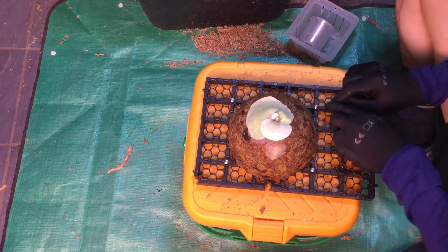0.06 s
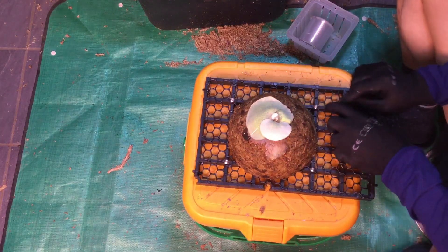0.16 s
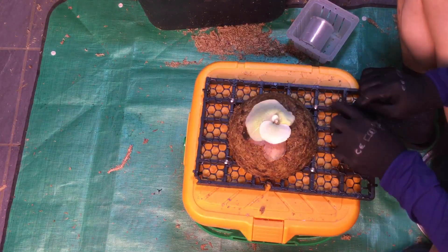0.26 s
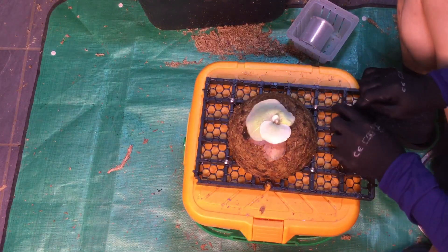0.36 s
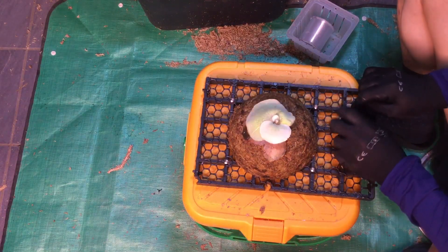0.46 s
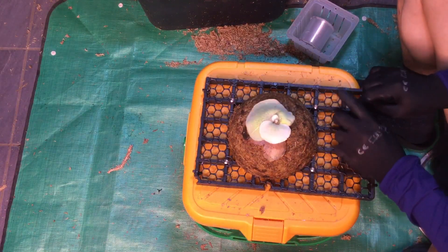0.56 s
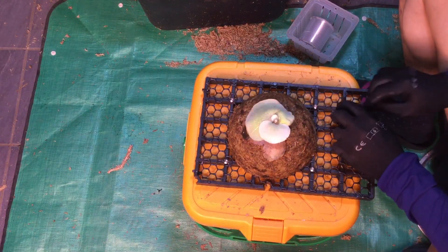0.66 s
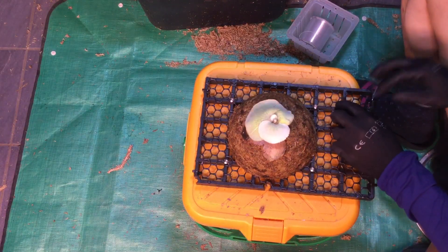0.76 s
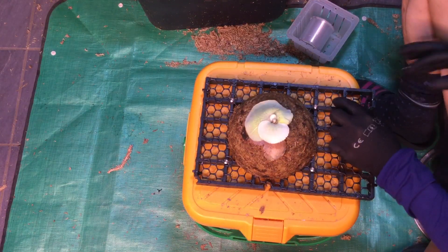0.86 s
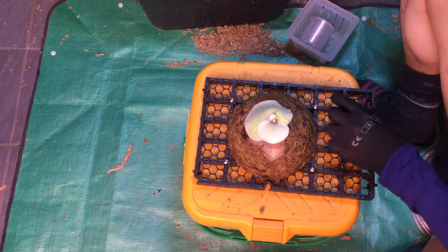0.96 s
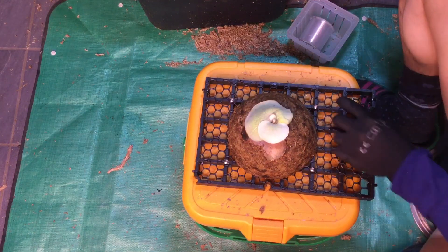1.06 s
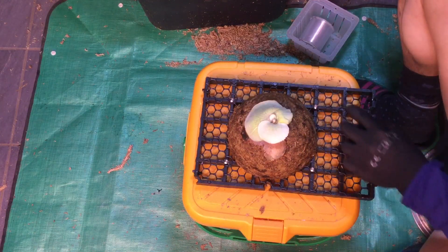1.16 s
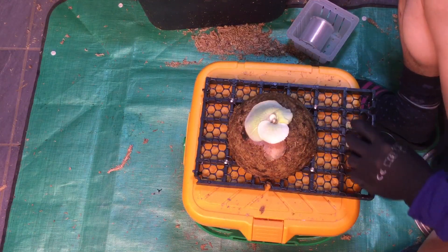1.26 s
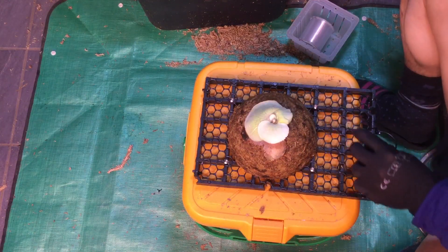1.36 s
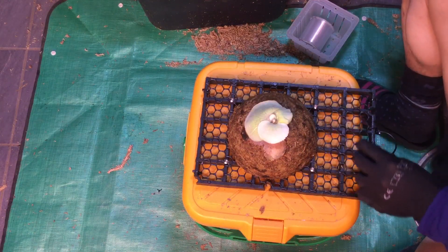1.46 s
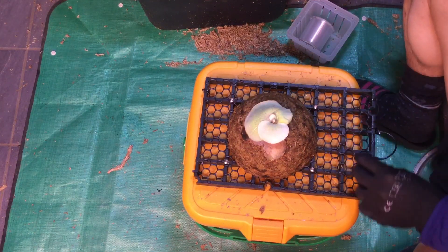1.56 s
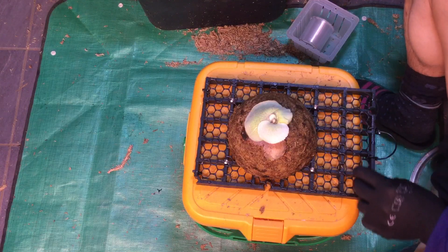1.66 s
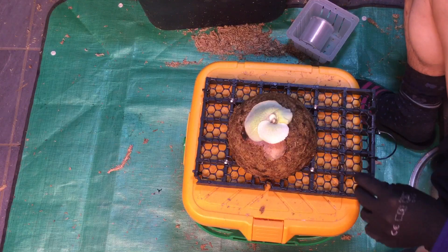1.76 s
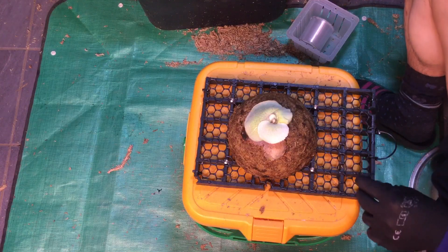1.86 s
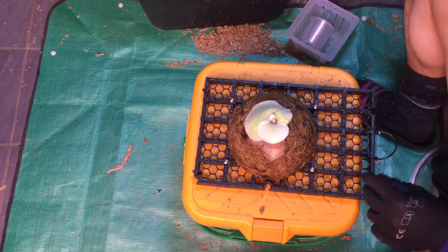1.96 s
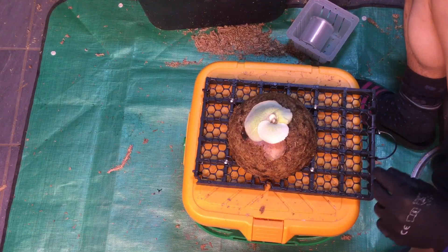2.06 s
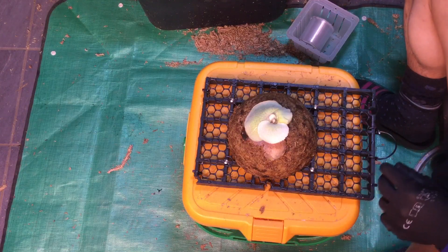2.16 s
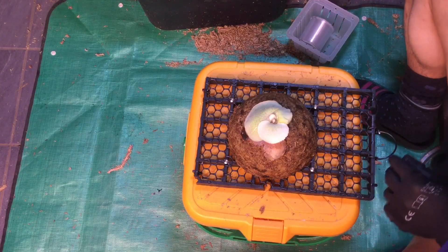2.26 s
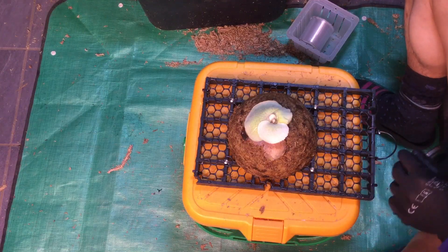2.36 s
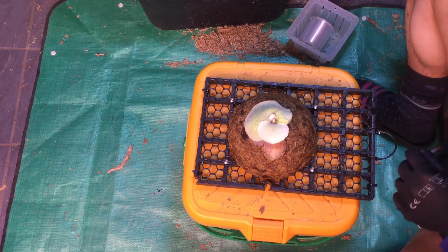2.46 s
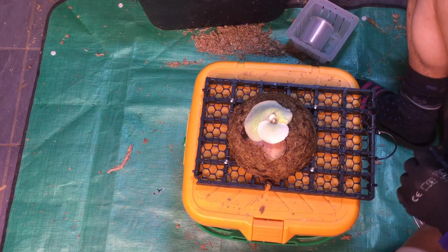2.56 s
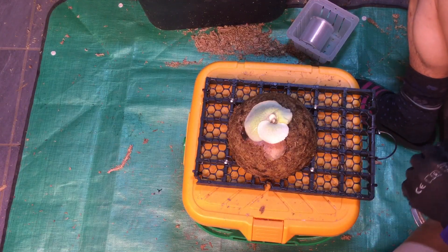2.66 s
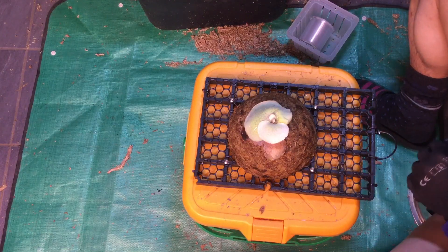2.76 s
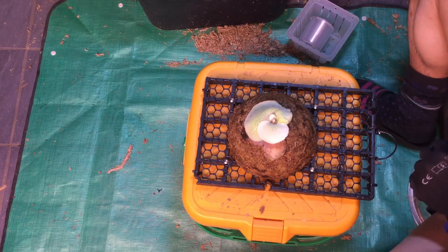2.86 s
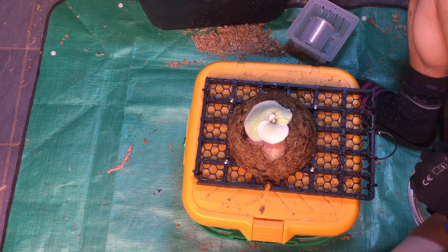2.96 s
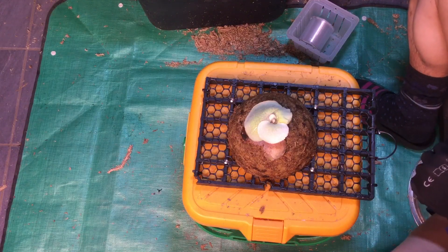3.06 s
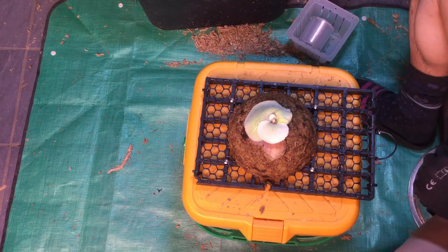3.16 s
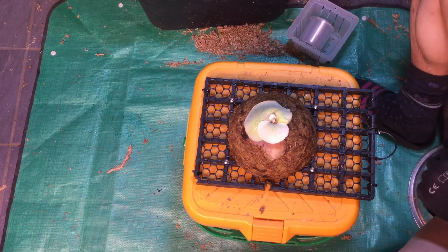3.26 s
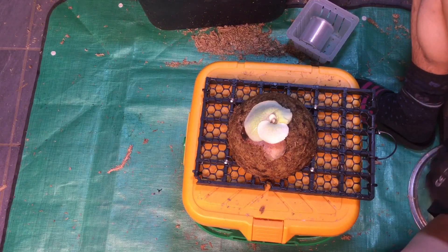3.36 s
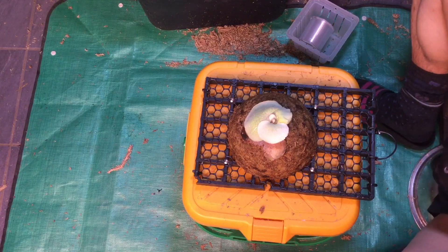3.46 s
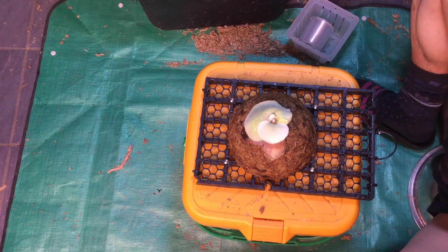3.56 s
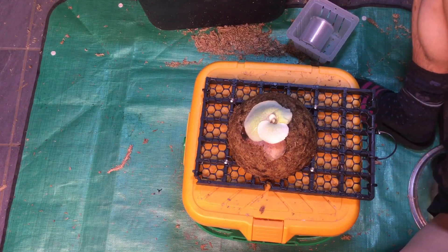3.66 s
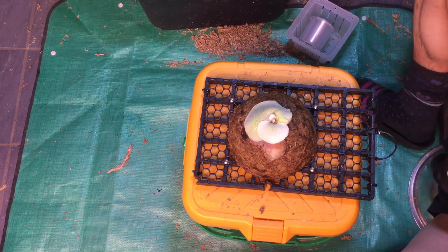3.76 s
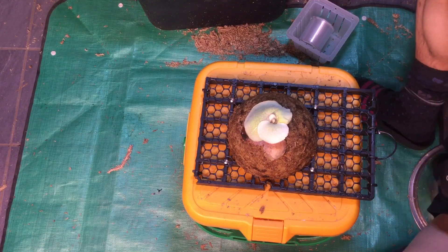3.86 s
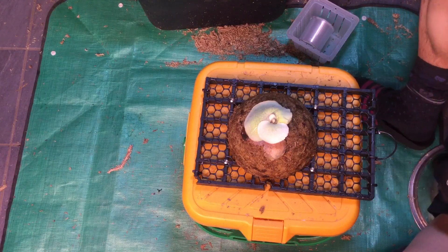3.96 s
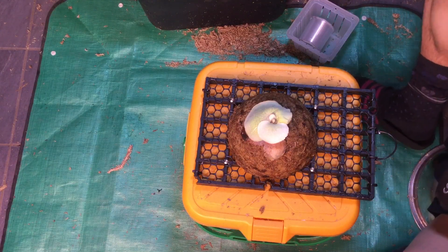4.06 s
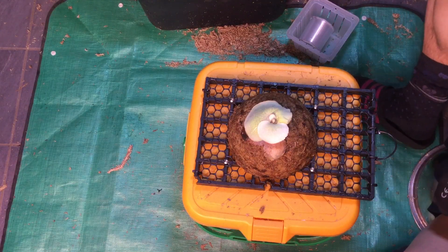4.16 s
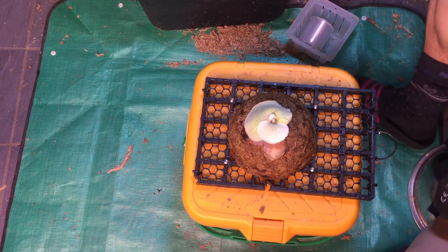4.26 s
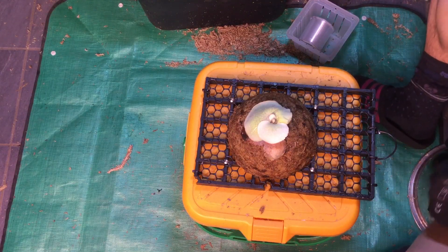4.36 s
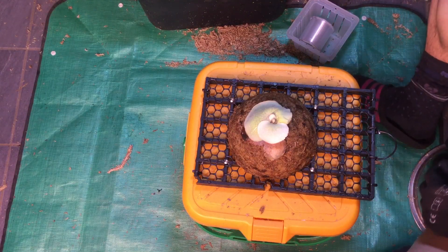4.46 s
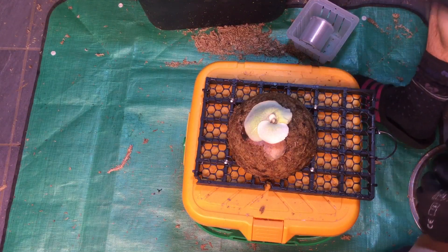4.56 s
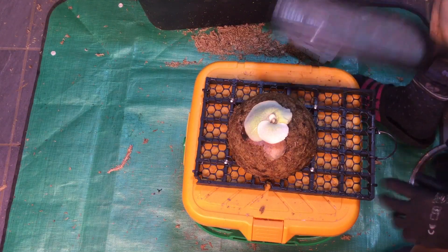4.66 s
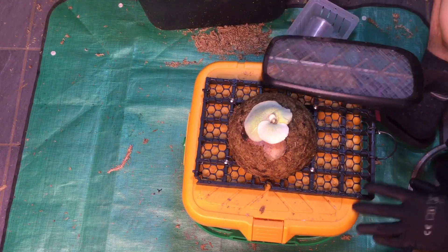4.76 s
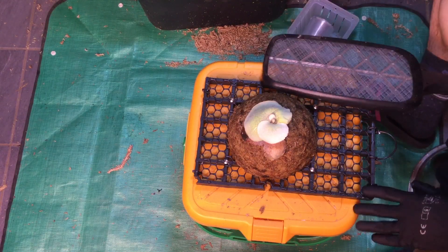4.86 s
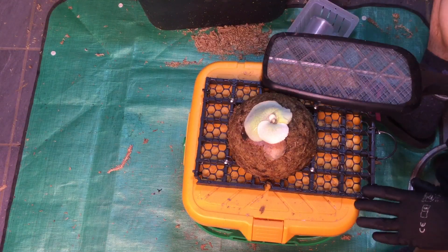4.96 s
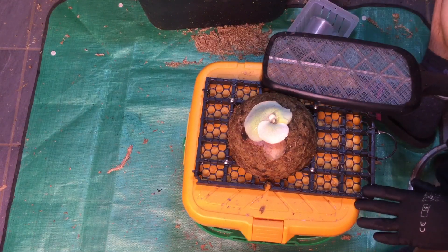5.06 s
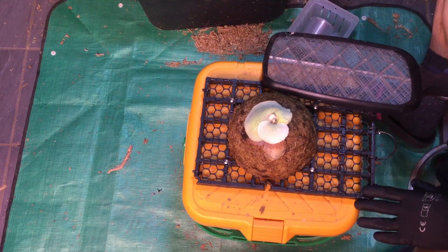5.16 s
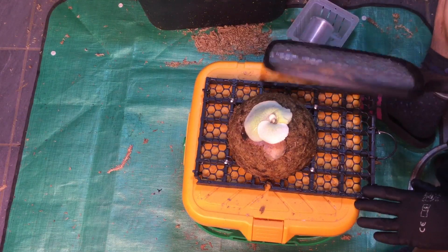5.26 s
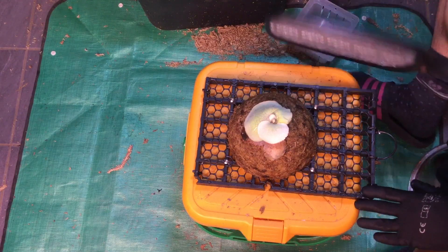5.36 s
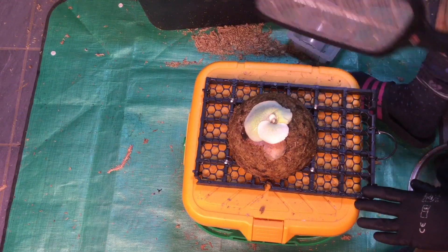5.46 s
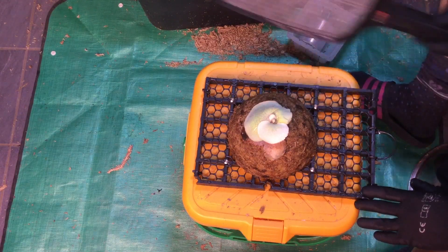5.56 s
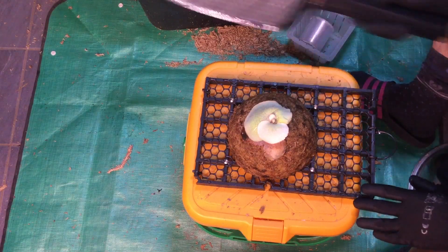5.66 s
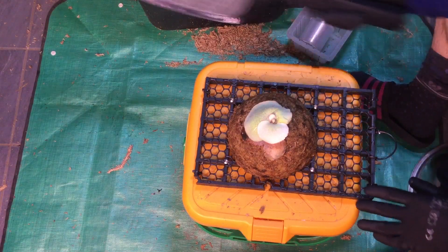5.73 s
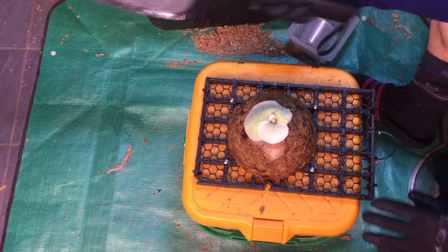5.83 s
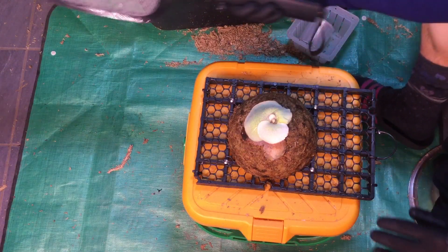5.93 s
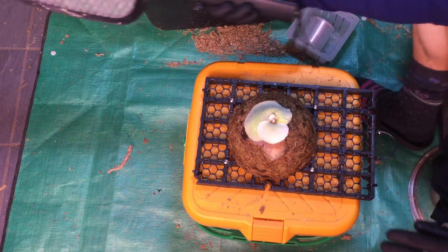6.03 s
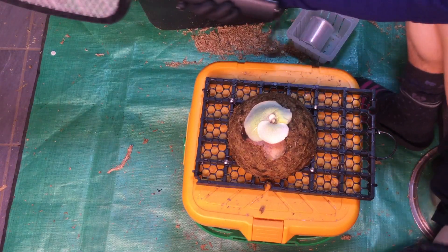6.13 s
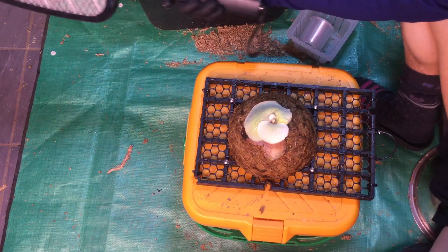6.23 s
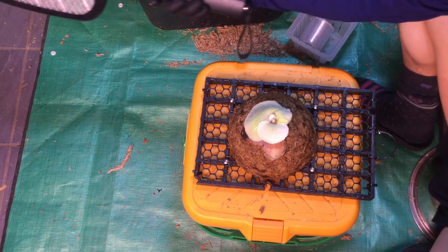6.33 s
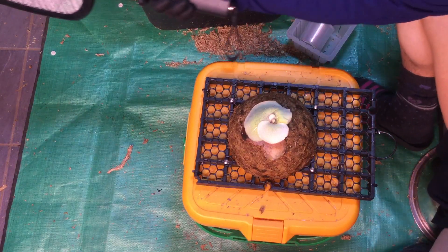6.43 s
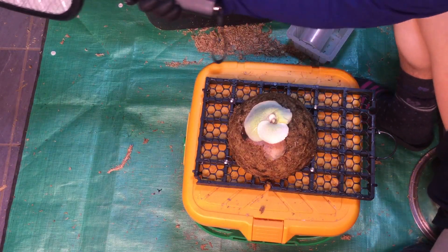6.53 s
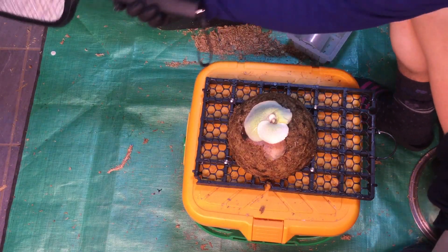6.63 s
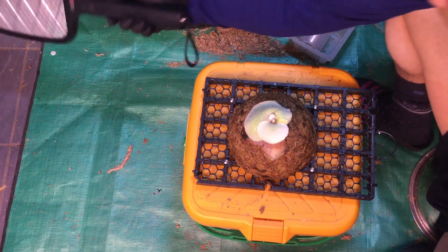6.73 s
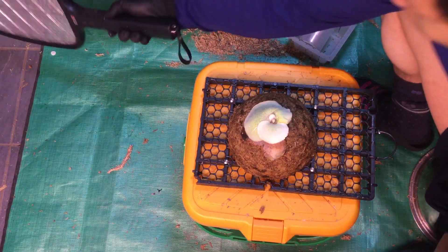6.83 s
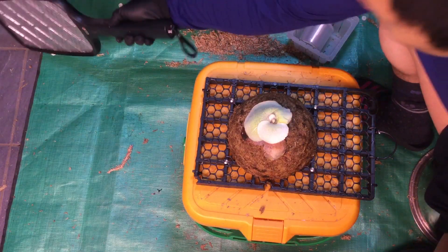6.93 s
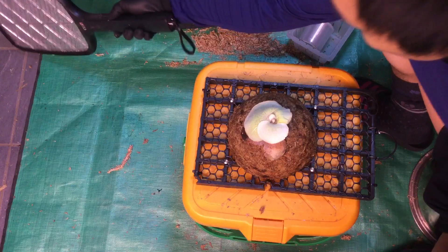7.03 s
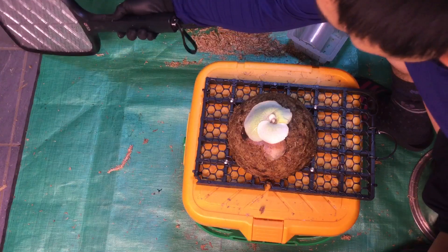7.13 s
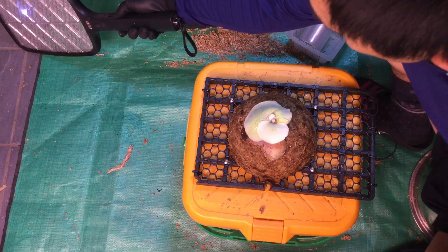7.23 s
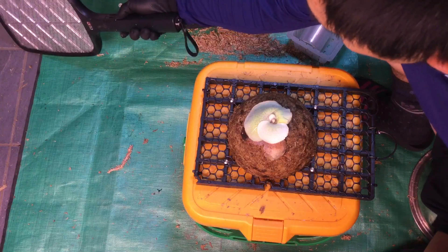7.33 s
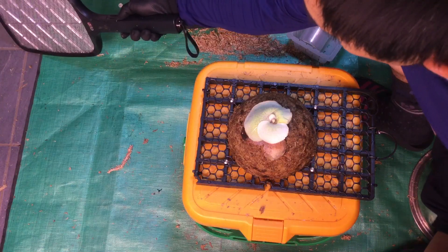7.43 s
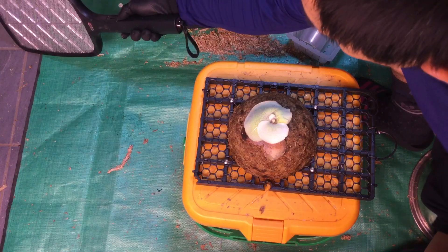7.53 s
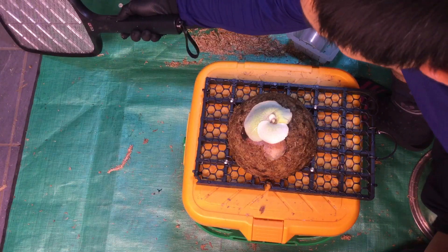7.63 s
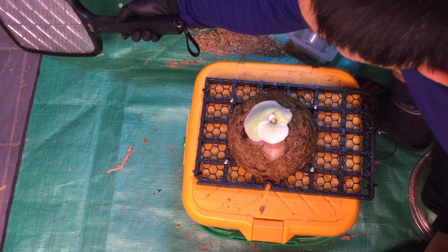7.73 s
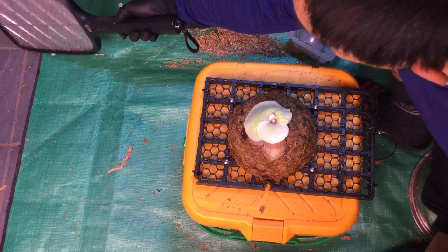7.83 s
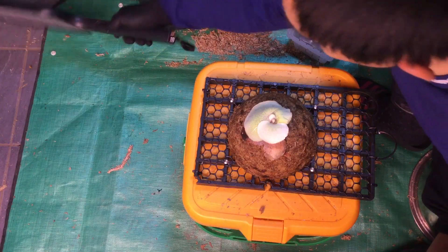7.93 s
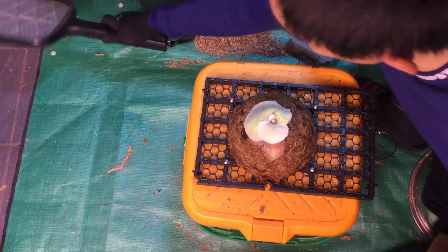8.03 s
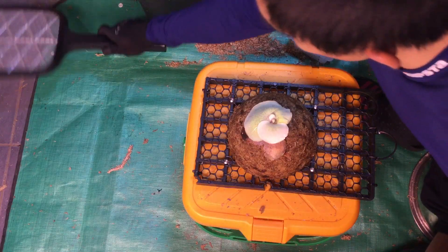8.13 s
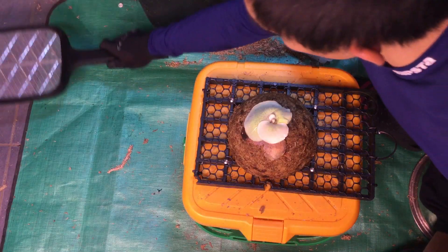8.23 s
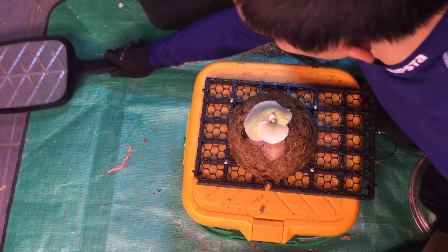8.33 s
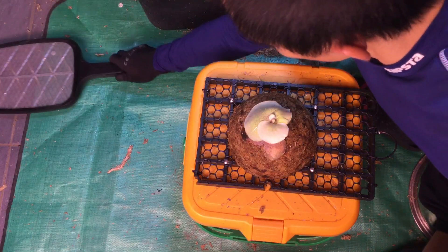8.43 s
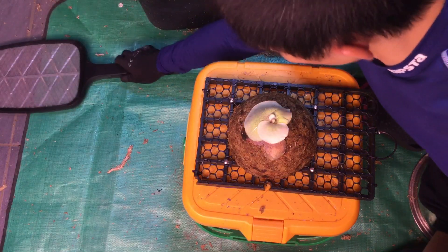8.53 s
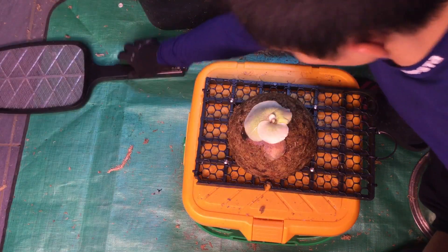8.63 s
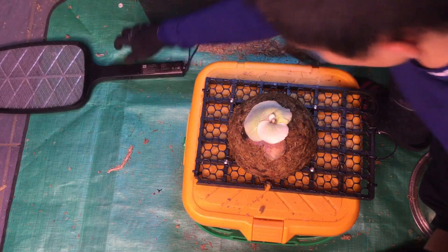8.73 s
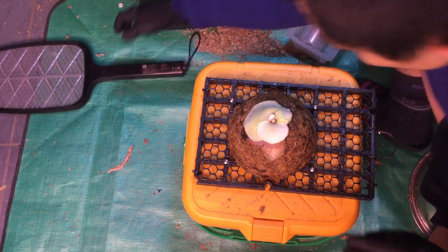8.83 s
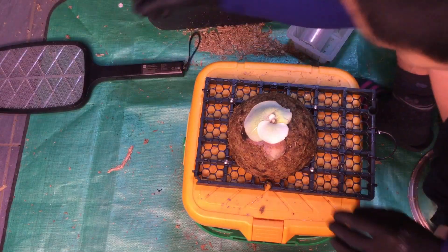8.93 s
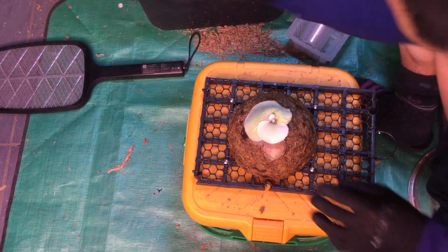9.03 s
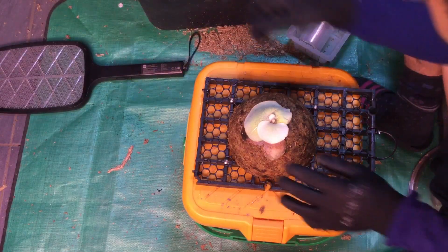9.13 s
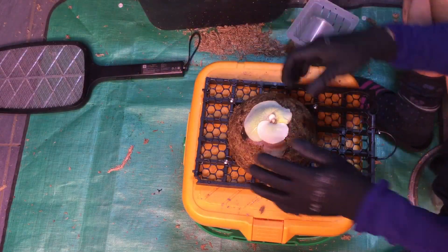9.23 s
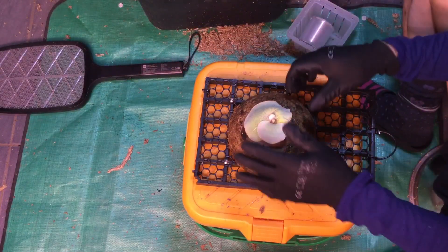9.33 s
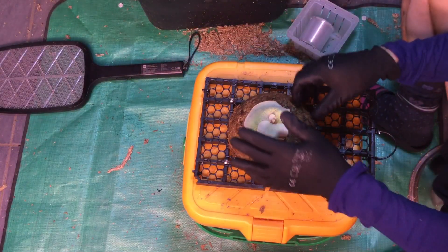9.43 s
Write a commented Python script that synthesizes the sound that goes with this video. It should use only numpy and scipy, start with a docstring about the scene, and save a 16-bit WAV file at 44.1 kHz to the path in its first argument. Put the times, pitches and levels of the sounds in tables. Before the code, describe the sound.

An electric fly racket is handled and fired indoors, close-miked with hard, bright reflections. First come sparse snaps, then a busy burst of plastic clatter, tarp rustle and hollow knocks with a thin metal ring. Small clicks and a hard plastic clack follow, then faint ticking. A single sharp spark bursts out, then three more close together, distorted and ending in short downward whomps. Quieter handling snaps and a soft sleeve brush finish.

```python
"""Small hard room: an electric fly racket sparks four times close to a microphone.
Sparks are noise cracks and jolts in dense reflections, a weak arc leading the second; the overloaded
microphone answers each of the four with a low whomp that glides down, a sine of falling pitch.
Gloved hands snap and knock a plastic box and a metal lid: noise clicks and dying modes. Drifting noise makes
tarp rustle, sleeve and low hum; random clicks tick, wavering sines squeak. Gain control ducks, peaks clip."""
import sys
import numpy as np
from scipy import signal
from scipy.fft import rfft, irfft
from scipy.io import wavfile
from scipy.ndimage import uniform_filter1d

SR = 44100
rng = np.random.default_rng(int(sys.argv[2]) if len(sys.argv) > 2 else 0)


def waveform_to_disk(signal):
    """Save audio, clipped to [-1, 1], as 16-bit WAV at the path in sys.argv[1]."""
    frames = np.transpose(np.atleast_2d(signal))
    scaled = np.clip(frames, -1, 1) * 32767
    samples = np.round(scaled).astype(np.int16)
    wavfile.write(sys.argv[1], SR, samples)


N = 418509


def gain_of(db):
    """Decibels to amplitude gain."""
    return 10 ** (np.asarray(db) / 20)


def evened(x):
    """Scales to rms 1."""
    return x / np.sqrt(np.mean(x ** 2) + 1e-20)


def read(points, hz):
    """Interpolates a table on a log-frequency axis."""
    f, value = np.transpose(points)
    return np.interp(np.log(hz + 1), np.log(f + 1), value)


def add(mix, s, sound):
    """Mixes a sound in at time s, cut at the end of the mix."""
    part = mix[round(s * SR):][:len(sound)]
    part += sound[:len(part)]


def click_in_room(colour, rise_s, lasting, grain_db, late_db, late_t60):
    """A click heard through dense reflections: coloured noise, each band decaying at its own rate."""
    # room decay before the factor lasting: f/Hz, t60/s
    room = [(300, 0.07), (700, 0.06), (1400, .11), (3000, .19), (6000, 0.18), (11000, 0.16), (15500, 0.14)]
    far_dull_db_per_octave = -3  # the long way round the room dulls the late tail
    t = np.arange(22050) / SR
    hz = np.fft.rfftfreq(len(t), 1 / SR)
    white, lumps = rng.standard_normal((2, len(t)))
    noise = rfft(white) * gain_of(read(colour, hz))
    noise /= np.sqrt(2 * np.sum(abs(noise) ** 2)) / len(t)
    out = np.zeros(len(t))
    for share, (centre_hz, t60) in zip(np.eye(len(room)), room):
        weights = read([(f, w) for (f, _), w in zip(room, share)], hz)
        band = irfft(noise * weights, len(t))
        early = gain_of(-60 * t / t60 / lasting)
        # a slower tail returns from the far end of the room
        dull_db = far_dull_db_per_octave * np.log2(centre_hz / 6000)
        late = gain_of(late_db + dull_db - 60 * t / late_t60)
        out += band * (early + late)
    # early echoes arrive in uneven clumps
    clump_db = grain_db * evened(uniform_filter1d(lumps, size=120)) * np.exp(-t / 0.03)
    return out * gain_of(clump_db) * (1 - np.exp(-t / rise_s))


def ring(modes, rise_s):
    """Struck body: exponentially dying sines with random phases."""
    t = np.arange(2 * SR) / SR
    out = np.zeros(len(t))
    for hz, db, t60 in modes:
        out += gain_of(db - 60 * t / t60) * np.sin(2 * np.pi * (hz * t + rng.random()))
    return (1 - np.exp(-t / rise_s)) * out


def drifting_noise(colour, level_db, patchy_db, flicker_db, size):
    """Random short-time spectra with drifting patches and a flicker shared by all bands."""
    frames, hz = 4 * N // size + 5, np.fft.rfftfreq(size, 1 / SR)
    a, b, patches = rng.standard_normal((frames, len(hz), 3)).T
    patches = uniform_filter1d(patches, size=6, axis=0)  # along frequency
    patches = evened(uniform_filter1d(patches, size=10, axis=1))  # along time
    flicker = evened(uniform_filter1d(rng.standard_normal(frames), size=8))
    bin_db = read(colour, hz)[:, None] + patchy_db * patches + flicker_db * flicker
    spectra = (a + 1j * b) * gain_of(bin_db)
    noise = evened(signal.istft(spectra, nperseg=size, noverlap=size - size // 4)[1][:N])
    return noise * gain_of(np.interp(np.arange(N) / SR, *np.transpose(level_db)))


def hum():
    """Low room hum: broad noise, strongest near 75 Hz, drifting slightly."""
    # hum spectrum: f/Hz, relative density/dB
    colour = [(24, -38.5), (40, -16), (75, 1.5), (140, -5), (230, -5), (312, -11.5), (800, -17.5),
              (1080, -14), (1400, -19.5), (2000, -25.5), (2700, -30), (4570, -36.5), (6020, -43),
              (11000, -49), (16000, -57.5)]
    # hum course: t/s, level/dB
    level = [(0.0, -47), (9.49, -55)]
    return drifting_noise(colour, level, 2.6, 0.55, size=2048)


def drones():
    """Noise swelling and sinking by chance in two narrow low room resonances."""
    # resonances: f/Hz, width/Hz, mean level/dB
    modes = [(119, 21, -61), (187, 50, -60)]
    waver_rms_db = 4.5
    out, times_s = np.zeros(N), np.arange(0, 10, .1)
    for hz, width, db in modes:
        peak = [(hz - 3 * width / 2, -80), (hz - width / 2, 0),
                (hz + width / 2, 0), (hz + 3 * width / 2, -80)]
        waver = evened(uniform_filter1d(rng.standard_normal(len(times_s)), size=3))
        level = list(zip(times_s, db + waver_rms_db * waver))
        out += drifting_noise(peak, level, 0, 0, size=4096)
    return out


def rustle():
    """Tarp and sleeves moving: flickering patchy noise under a level curve."""
    # rustle spectrum: f/Hz, relative density/dB
    colour = [(590, -26.5), (1000, -6), (2280, -9.5), (2780, -11.5), (3050, -8.5), (6700, -16),
              (13300, -18.5), (16000, -22)]
    # rustle course: t/s, level/dB
    level = [(0.0, -89), (0.53, -77), (0.85, -70), (1.62, -87), (1.84, -61), (2.3, -51.5), (2.43, -42.5),
             (2.8, -44), (2.92, -75), (3.2, -64.5), (3.33, -73), (3.5, -60), (3.92, -62.5), (4.1, -73),
             (4.2, -65.5), (4.5, -76), (5.7, -70.5), (6.102, -74), (8.099, -67), (8.6, -76), (9.49, -73)]
    return drifting_noise(colour, level, 2.2, 3.2, size=512)


def sleeve():
    """A sleeve brushes softly as the hands reach in: mid-band noise with little flicker."""
    # brush spectrum: f/Hz, relative density/dB
    colour = [(900, -30), (1500, -3), (2600, 0.1), (4200, -6), (6500, -26), (16000, -45)]
    # brush course: t/s, level/dB
    level = [(8.95, -95), (9.1, -66), (9.3, -65.5), (9.49, -66.5)]
    return drifting_noise(colour, level, 2.2, 1.2, size=1024)


def ticks():
    """Racket waved: sparse random clicks of uneven size and set louder mesh ticks, with a short room tail."""
    # random ticks: t/s, rate/(1/s), none below zero
    tick_rate = [(4.95, 0), (5.0, 40), (5.7, -9)]
    # tick spectrum: f/Hz, relative density/dB
    colour = [(5000, -28), (8500, -2), (11000, -3), (14000, 8), (16000, -3.5)]
    # louder mesh ticks: t/s, level/dB
    mesh_ticks = [(5.116, -52), (5.286, -51), (5.384, -54), (5.674, -51), (5.821, -53), (8.015, -47)]
    least_db = -59.5
    chance, size = rng.random(N), rng.exponential(1, N)
    rate = np.interp(np.arange(N) / SR, *np.transpose(tick_rate))
    train = (chance < rate / SR) * gain_of(least_db + 1.9 * np.minimum(size, 4))
    for s, db in mesh_ticks:
        add(train, s, gain_of([db]))
    return signal.oaconvolve(train, click_in_room(colour, 0.00025, 0.13, 1.5, -12, 0.19))[:N]


def squeaks():
    """Thin glove squeaks: short high sines with randomly wavering pitch."""
    # squeaks: t/s, length/s, mean f/Hz, level/dB
    whistles = [(2.978, 0.053, 9200, -61.5), (3.03, 0.04, 13200, -61)]
    out = np.zeros(N)
    for s, length_s, hz, db in whistles:
        waver = evened(uniform_filter1d(rng.standard_normal(8820), size=200))[:round(length_s * SR)]
        turns = np.cumsum(hz * (1 + 0.014 * waver)) / SR
        window = signal.windows.tukey(len(turns), .5)
        add(out, s, gain_of(db) * np.sin(2 * np.pi * turns) * window)
    return out


def snaps():
    """Plastic, clips and tarp snap: tilted noise clicks; drawn-out ones scrape, then die faster."""
    # snaps: t/s, level/dB, decay factor, tilt/(dB/octave), body below 1.5 kHz/dB, bite at 4-5 kHz/dB
    events = [(0.266, -30, 0.69, -4.5, -4.5, -2.1), (0.583, -48.5, 0.65, -4.5, -1.5, 3),
              (1.641, -47, 1.7, 3.5, 5, 0.1), (1.669, -42.5, 1.6, 1, 6, 2),
              (1.752, -40.5, 2.7, -0.6, 12, -4), (1.871, -43.5, 0.47, -0.5, 16, 0.1),
              (1.987, -41, 0.97, 0.5, -4, 5), (2.059, -38.5, 2.4, -0.4, -1, 2.5),
              (2.249, -24.5, 1.8, 2.5, -1, 4), (2.316, -27.5, 1.7, -4, -3.5, 0.1),
              (2.368, -19, 1.5, -2, -4, -3.5), (2.514, -25.5, 1.8, 0.1, -1.5, -1.5),
              (2.608, -26, 0.99, -2.5, 3, 5), (2.66, -27, 1.77, 2, 5, 3.5),
              (2.771, -38.5, 3.1, -6.5, -17, 7), (2.819, -40.5, 2.45, -2.5, 0.5, -6),
              (2.988, -45.5, 0.69, -9.5, -17, -5), (3.138, -55, 1.4, 0.1, 5, 3),
              (3.542, -51, 0.23, 2.5, 9, 0.1), (3.789, -49, 0.64, -5, 1, 7),
              (3.853, -45.5, 0.5, -4.5, 0, 6), (4.208, -55, 2.3, -6.5, -17, 0.1),
              (4.243, -45.5, 0.53, -0.3, 5, -5), (4.38, -59, 0.5, 3, 0.9, 2),
              (4.829, -18.5, 2.16, 2, 16, 4.5), (4.872, -22, 0.67, 2.5, 13, 7),
              (5.541, -49.5, 0.8, -2.5, -16, -3), (6.908, -59, 0.6, 0.1, 1.8, 5),
              (8.062, -45, 1.55, -5, -15, -1), (8.133, -35, 0.76, -3.5, -4, -6),
              (8.213, -33.5, 0.54, -12.5, -10.5, 0.1), (8.556, -28.5, 2.6, 2.5, -10.5, 1.5),
              (8.598, -35, 1.2, -3, -20, 12), (8.69, -21, 1.32, -3.5, -8, 1.5)]
    # common snap spectrum: f/Hz, relative density/dB
    base_colour = [(250, -55), (900, -46), (2000, -46.5), (3200, -48), (4300, -46.5), (5600, -51),
                   (8000, -53.5), (13000, -54)]
    scrape_s, let_go_db_per_s = 0.11, 200
    out, t = np.zeros(N), np.arange(22050) / SR
    near = 1 + 0.2 * np.exp(-t / 0.00034)  # direct tick stands out of its echoes
    for s, db, lasting, tilt_db, body_db, bite_db in events:
        colour = []
        for hz, density_db in base_colour:
            tilted_db = density_db + tilt_db * np.log2(hz / 4500)
            colour.append((hz, tilted_db + body_db * (hz < 1500) + bite_db * (4000 < hz < 5000)))
        let_go = gain_of(-let_go_db_per_s * np.maximum(t - scrape_s, 0) * (lasting > 1.2))
        click = click_in_room(colour, 1 / 2000, lasting, 1.1, -33.0, 0.68)
        add(out, s, gain_of(db) * near * let_go * click)
    return out


def knocks():
    """Knocks on the hollow box: its modes ring and loose contents rattle as slow-rising noise."""
    # knocks: t/s, relative level/dB, mode pitch factor
    blows = [(0.27, -28.5, 0.88), (1.761, -31, 0.98), (2.01, -33.5, 0.8), (2.06, -27, 0.94),
             (2.328, -20.5, 1), (2.369, -13, 0.99), (2.457, -24, 0.91), (2.54, -18, 0.91),
             (2.615, -15, 0.94), (2.768, -30, 0.88), (4.835, -22.5, 0.93), (8.212, -38, 0.9),
             (8.693, -41.5, 0.97)]
    # box modes before the pitch factor: f/Hz, relative level/dB, t60/s
    box = [(100, -14, 0.15), (168.6, -1.5, 0.23), (201.6, 1, 0.28), (277, -8, 0.34), (353.5, -2.5, 0.29),
           (413, -5.5, 0.12), (577, -32.5, 0.3), (688, -12.5, 0.15), (805, -9.5, 0.1)]
    # rattle spectrum: f/Hz, relative density/dB
    rattle_colour = [(60, -2.5), (120, 5), (250, 11), (500, -3.5), (900, -11.5), (1600, -36)]
    out = np.zeros(N)
    for s, db, factor in blows:
        modes = [(hz * factor, mode_db, t60) for hz, mode_db, t60 in box]
        add(out, s, gain_of(db - 6.0) * ring(modes, 0.003))
        add(out, s, gain_of(db - 5.0) * click_in_room(rattle_colour, 0.016, 3.0, 1.8, -29, 0.34))
    return out


def racket_blows():
    """Blows on the plastic racket frame: short-lived modes."""
    # frame modes: f/Hz, relative level/dB, t60/s
    frame = [(817, -9, 0.037), (1800, -6.5, 0.058), (2370, -7, 0.045), (2850, -14.5, 0.031),
             (3700, -7.5, 0.035), (4274, -5.5, 0.021)]
    # blows: t/s, relative level/dB
    blows = [(4.832, -28), (4.873, -30), (8.693, -11.5)]
    out = np.zeros(N)
    for s, db in blows:
        add(out, s, gain_of(db) * ring(frame, 0.00085))
    return out


def lid():
    """Metal lid struck once: long high modes, stopped by a hand."""
    # lid modes: f/Hz, level/dB, t60/s
    modes = [(2532, -39, 2.), (2549, -50, 2.), (4000, -56, 1.2)]
    blow_s, held_s, held_db_per_s = 2.369, 3.37, 300
    out = np.zeros(N)
    tone = ring(modes, 0.0018)
    since_held_s = np.maximum(np.arange(len(tone)) / SR + blow_s - held_s, 0)
    add(out, blow_s, tone * gain_of(-held_db_per_s * since_held_s))
    return out


def sparks():
    """A bright crack fills the room, the frame jolts; the overloaded microphone adds a down-gliding whomp."""
    # sparks: t/s, crack/dB, jolt/dB, whomp/dB, whomp start f/Hz, glide/s, whomp t60/s
    events = [(6.1503, -7.5, -8, -0.2, 831, 0.0027, .05), (7.003, -6, -6, -5.5, 510, 0.006, 0.095),
              (7.1672, -6.5, -4, -1.5, 753, .0062, .07), (7.324, -7, -1.5, -1, 698, 0.0056, 0.061)]
    # weaker arc just ahead of the second spark, no whomp: t/s, crack/dB, jolt/dB
    first_arc = (6.999, -15.5, -9.5)
    # crack spectrum: f/Hz, relative density/dB
    crack_colour = [(300, -38.5), (600, 1.5), (1100, -2.5), (2000, -7.5), (3800, -2), (6600, -4),
                    (10000, 0), (13800, 5), (16500, -10)]
    # jolt spectrum: f/Hz, relative density/dB
    jolt_colour = [(100, -10.5), (300, 7.5), (700, 2.5), (1300, 2.5), (2200, -5.5), (4000, -22)]
    whomp_end_hz = 50
    out, t = np.zeros(N), np.arange(22050) / SR
    near = 1 + 0.14 * np.exp(-t / 0.11)  # direct sound and nearest surfaces come strongest
    for s, crack_db, jolt_db in [first_arc] + [row[:3] for row in events]:
        crack = near * click_in_room(crack_colour, 0.00071, 1, 0.52, -41, 1.0)
        jolt = click_in_room(jolt_colour, 0.00027, 0.45, 2.1, -60.5, .3)
        add(out, s, gain_of(crack_db) * crack)
        add(out, s, gain_of(jolt_db) * jolt)
    # the microphone's answer to each spark
    for s, _, _, whomp_db, from_hz, glide_s, t60 in events:
        pitch_hz = whomp_end_hz + (from_hz - whomp_end_hz) * np.exp(-(t / glide_s) ** 2)
        turns = np.cumsum(pitch_hz) / SR
        add(out, s, gain_of(whomp_db - 60 * t / t60) * np.sin(2 * np.pi * turns))
    return out


def scene():
    """All sources summed at one microphone."""
    background = hum() + drones() + rustle() + sleeve()
    handling = ticks() + squeaks() + snaps() + knocks() + racket_blows() + lid()
    return (background + handling + sparks())[None]


def record(dry):
    """Bass loss, then gain control falling just after loud sound and recovering slowly, overload, band limit."""
    threshold_db, recovery_db_per_s, duck_ratio, lag_s = -19.0, 20.5, 0.34, .045
    edge_hz = 15950
    dry = signal.lfilter(*signal.butter(2, 48, "high", fs=SR), dry)  # microphone loses deep bass
    power_db = 10 * np.log10(abs(uniform_filter1d(dry[0] ** 2, size=400)) + 1e-12)
    # peak hold, sinking at a steady rate
    fall_db = np.arange(N) * recovery_db_per_s / SR
    held_db = np.maximum.accumulate(power_db + fall_db) - fall_db
    over_db = np.maximum(held_db - threshold_db, 0)
    lag = np.exp(-1 / (lag_s * SR))
    duck_db = duck_ratio * signal.lfilter([1 - lag], [1, -lag], over_db)
    clipped = np.clip(dry / gain_of(duck_db), -1, 1)
    low_pass = signal.firwin(511, edge_hz, window=("kaiser", 9), fs=SR)
    out = signal.oaconvolve(clipped, low_pass[None], "same")
    return np.clip(out, -1, 1)


dry = scene()
out = record(dry)
waveform_to_disk(out)
```